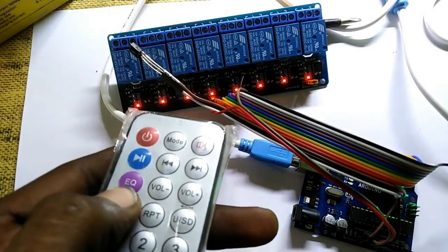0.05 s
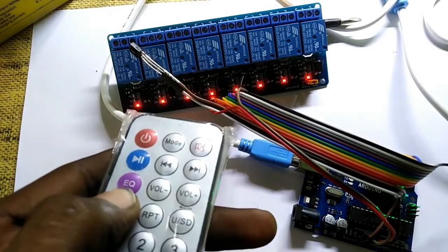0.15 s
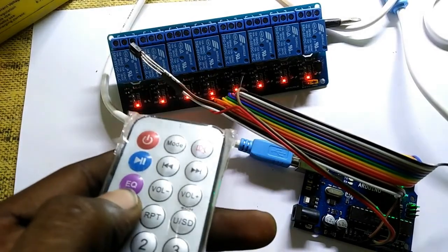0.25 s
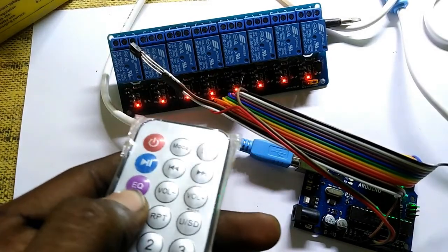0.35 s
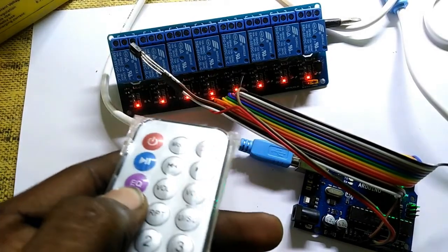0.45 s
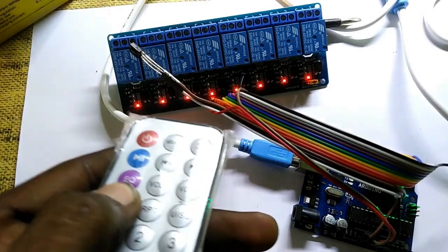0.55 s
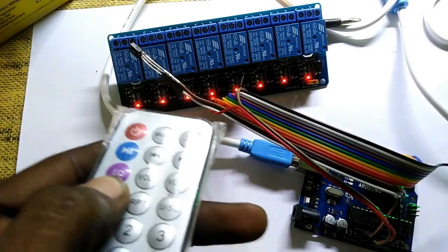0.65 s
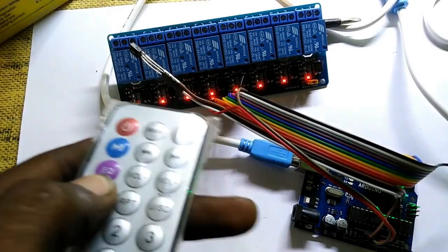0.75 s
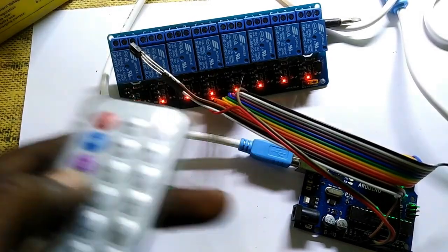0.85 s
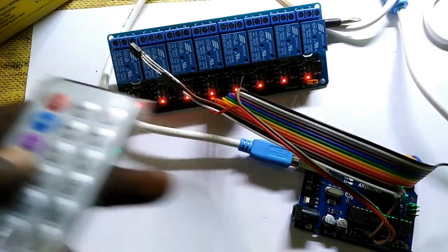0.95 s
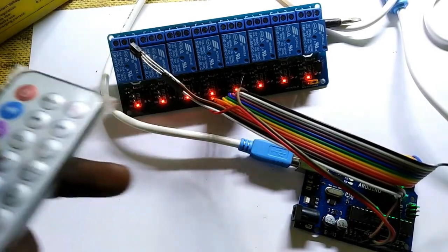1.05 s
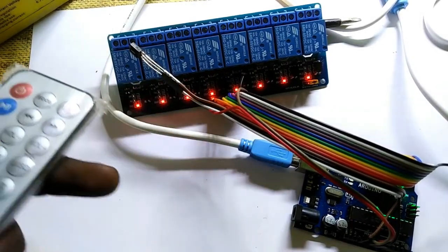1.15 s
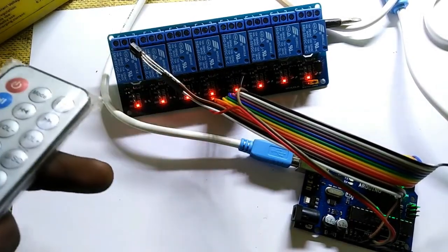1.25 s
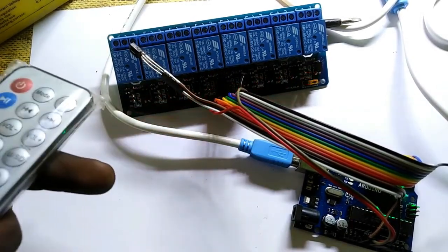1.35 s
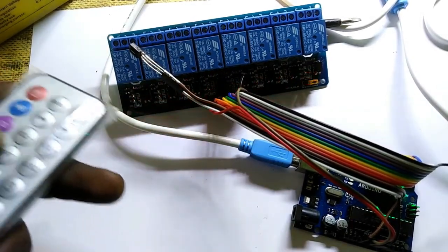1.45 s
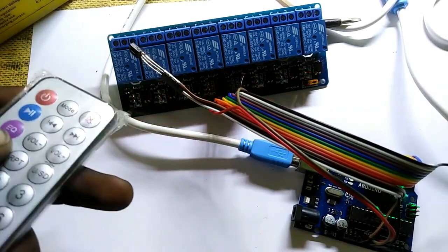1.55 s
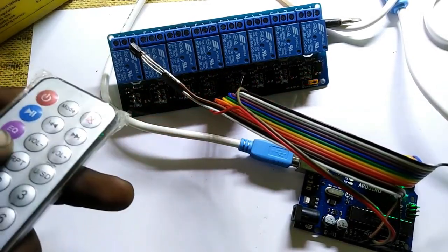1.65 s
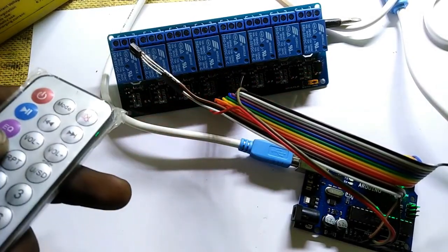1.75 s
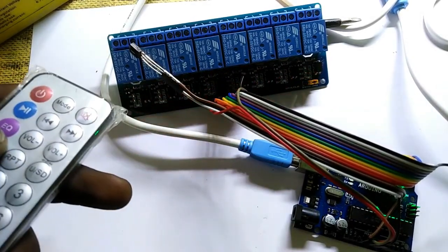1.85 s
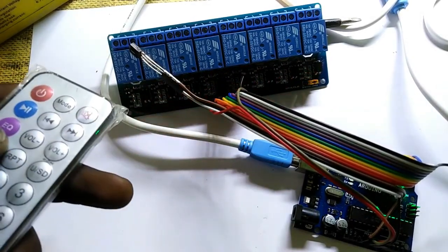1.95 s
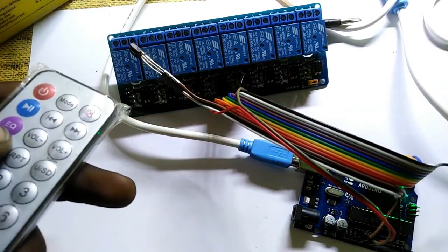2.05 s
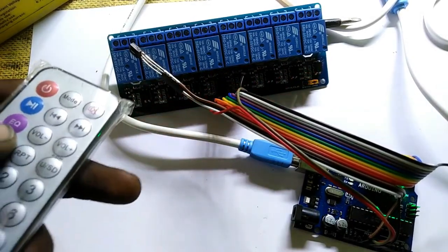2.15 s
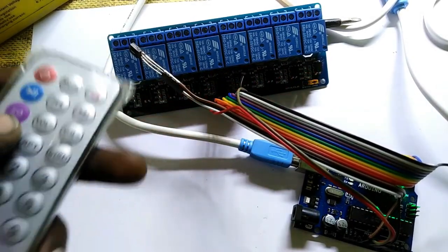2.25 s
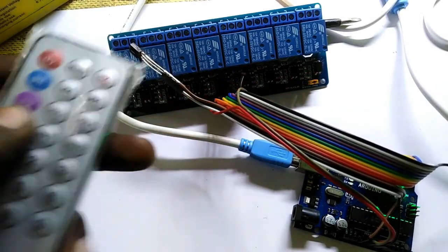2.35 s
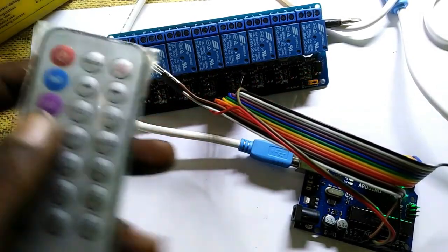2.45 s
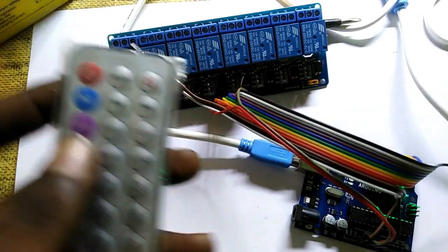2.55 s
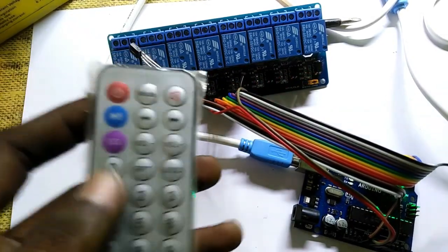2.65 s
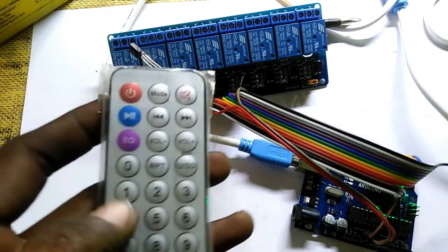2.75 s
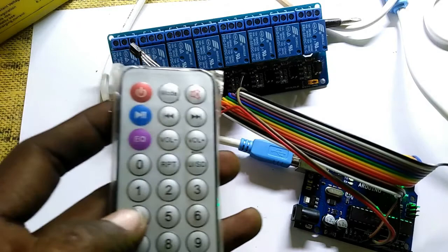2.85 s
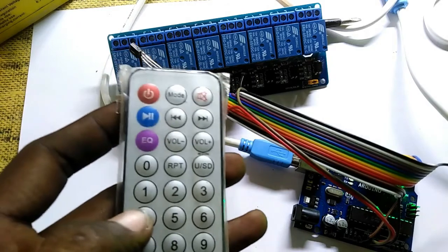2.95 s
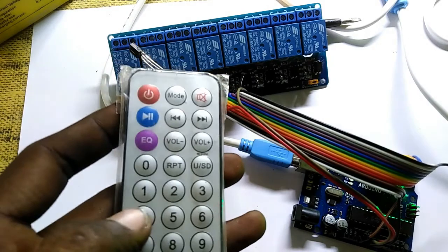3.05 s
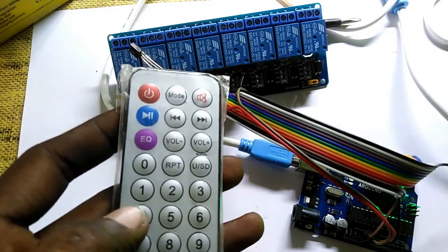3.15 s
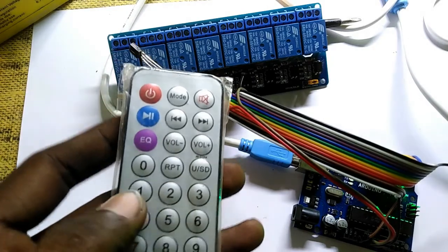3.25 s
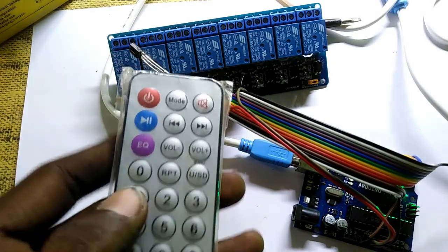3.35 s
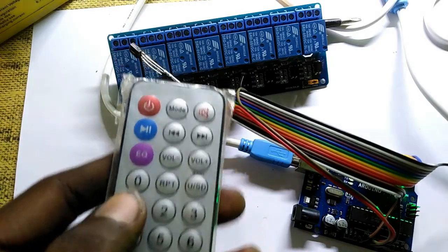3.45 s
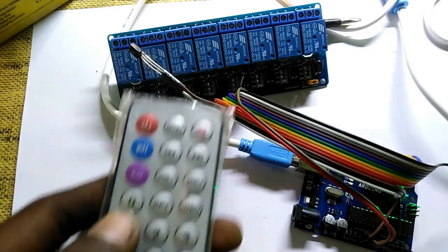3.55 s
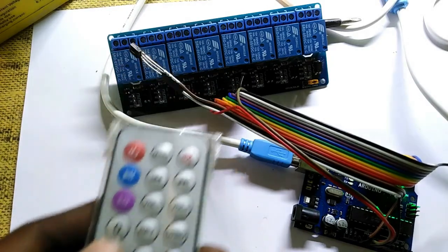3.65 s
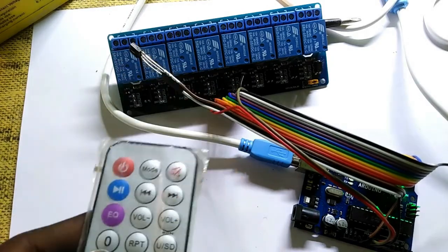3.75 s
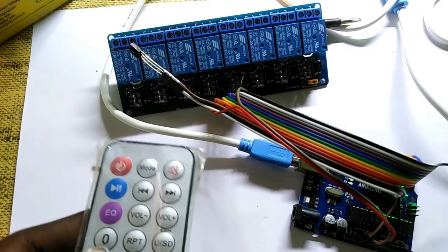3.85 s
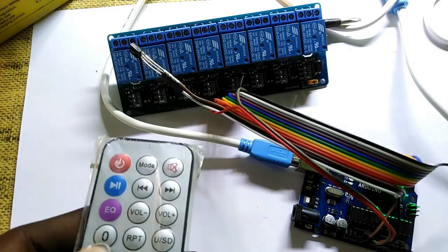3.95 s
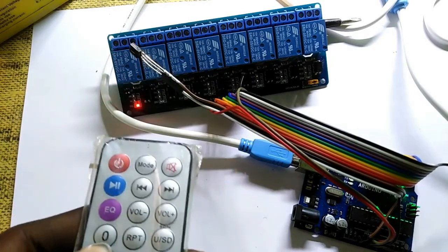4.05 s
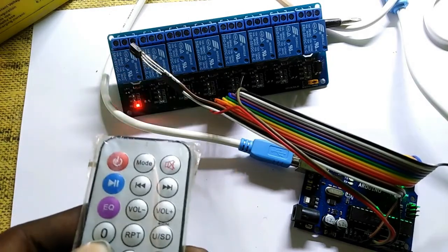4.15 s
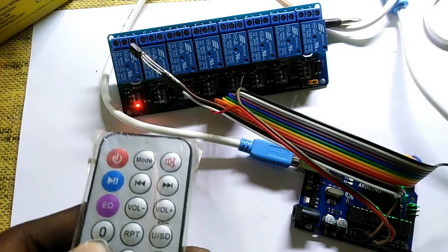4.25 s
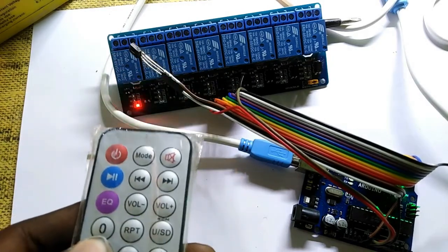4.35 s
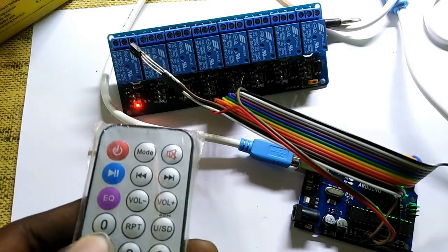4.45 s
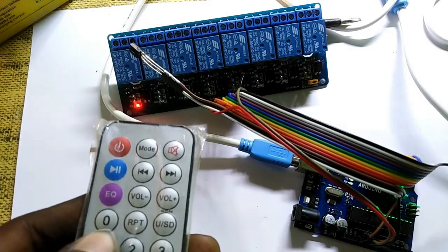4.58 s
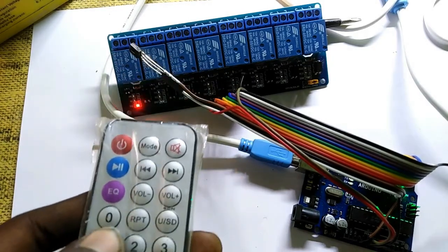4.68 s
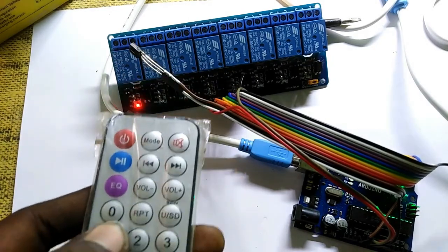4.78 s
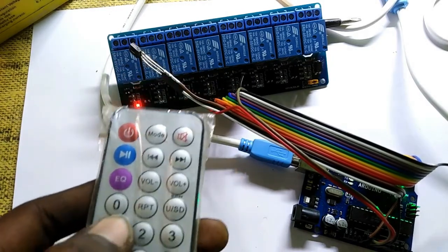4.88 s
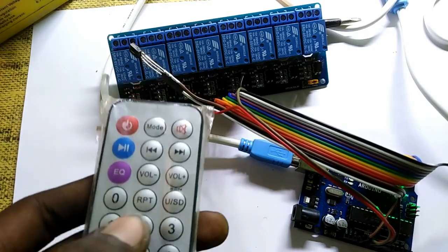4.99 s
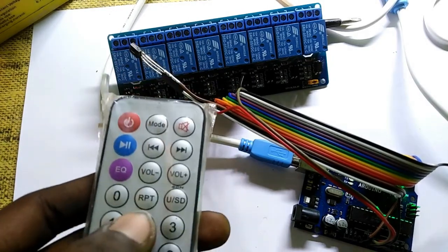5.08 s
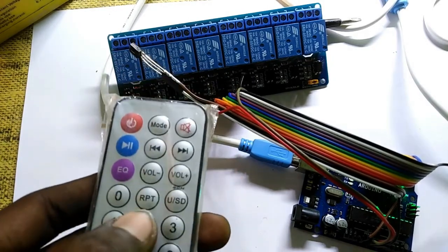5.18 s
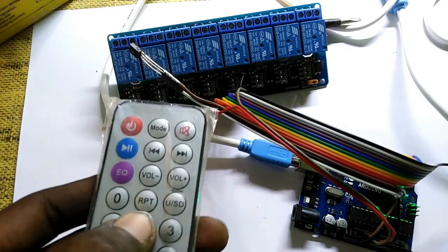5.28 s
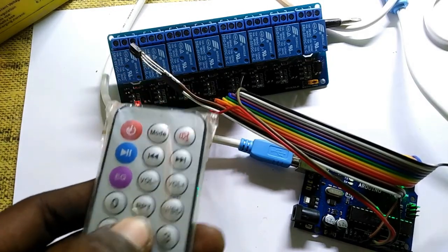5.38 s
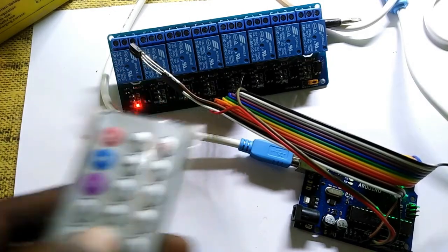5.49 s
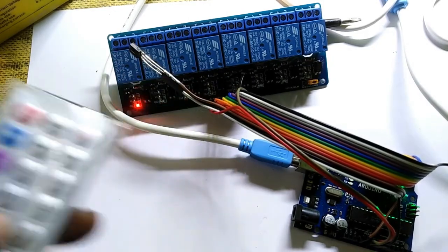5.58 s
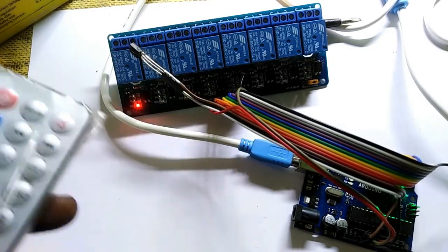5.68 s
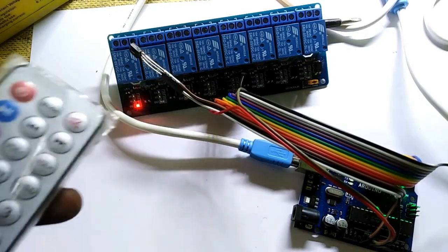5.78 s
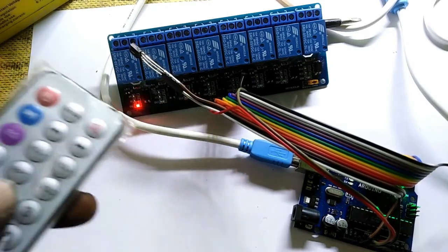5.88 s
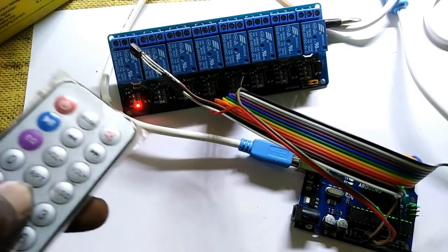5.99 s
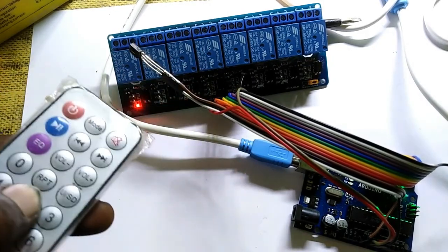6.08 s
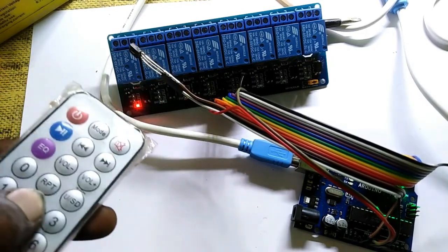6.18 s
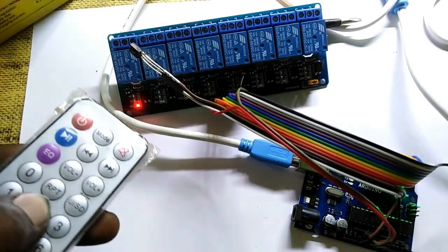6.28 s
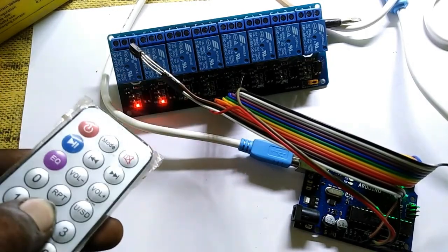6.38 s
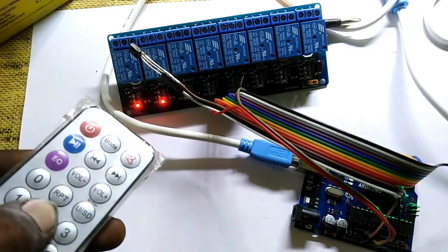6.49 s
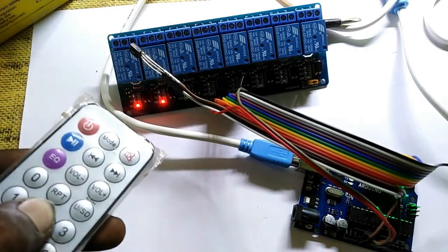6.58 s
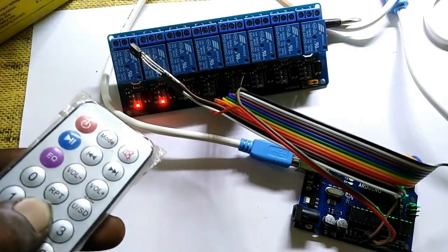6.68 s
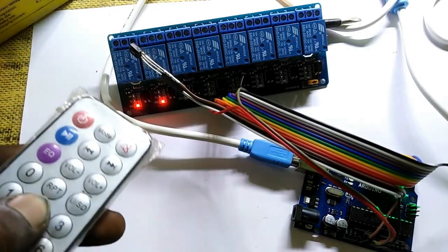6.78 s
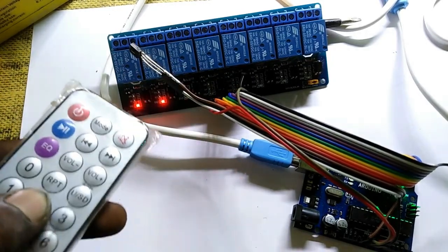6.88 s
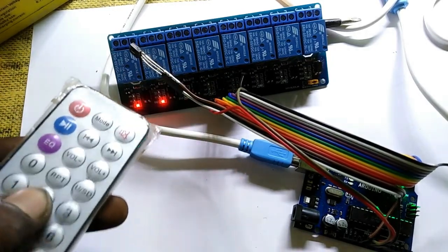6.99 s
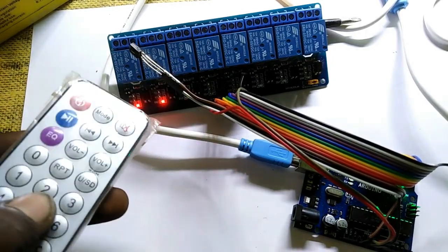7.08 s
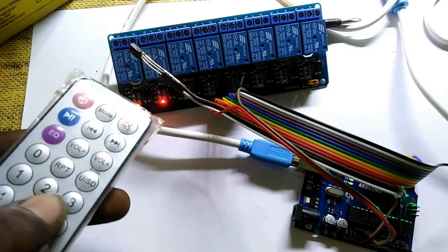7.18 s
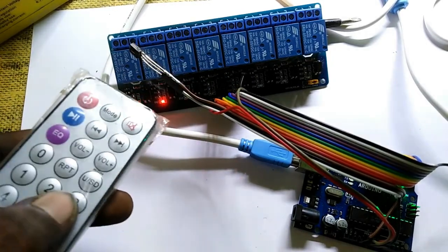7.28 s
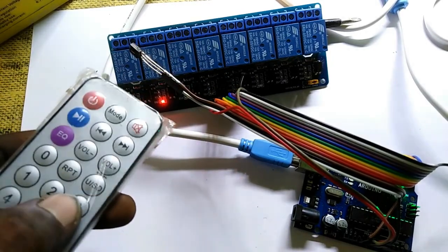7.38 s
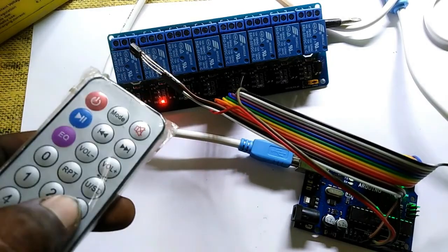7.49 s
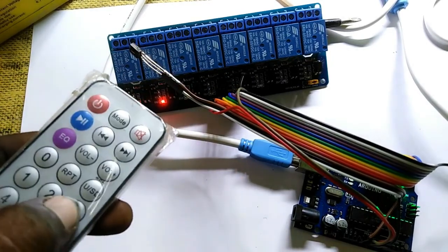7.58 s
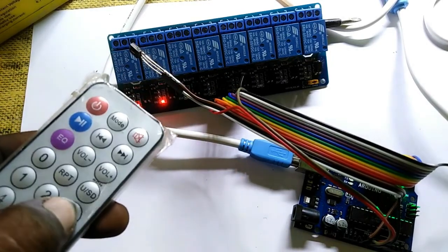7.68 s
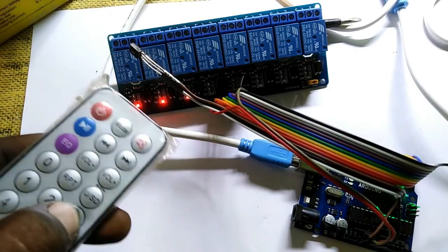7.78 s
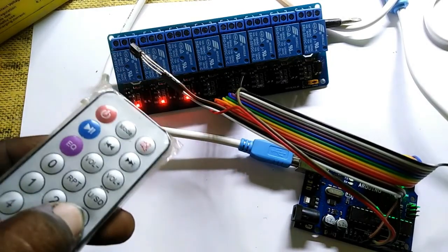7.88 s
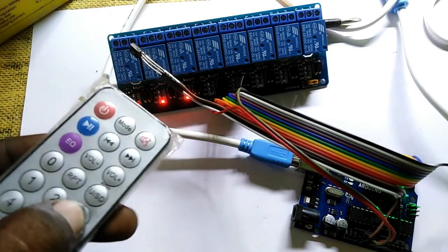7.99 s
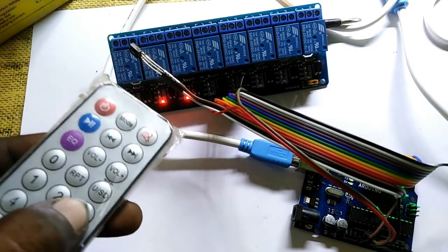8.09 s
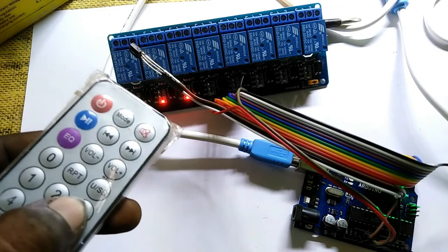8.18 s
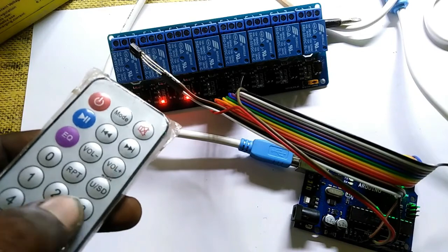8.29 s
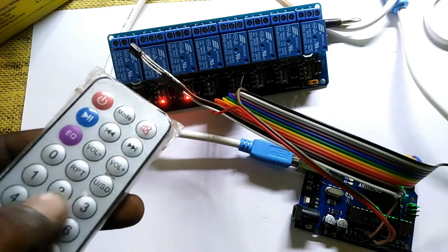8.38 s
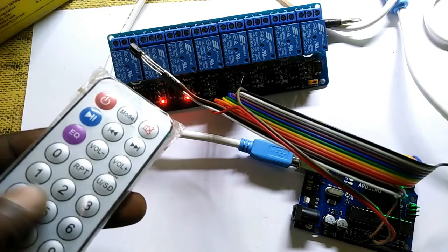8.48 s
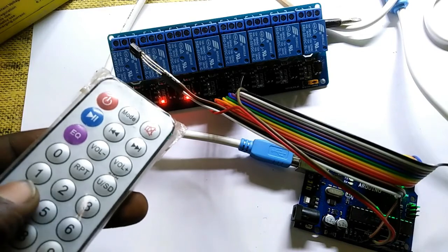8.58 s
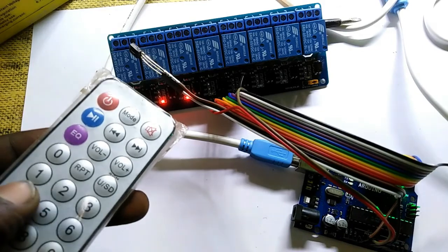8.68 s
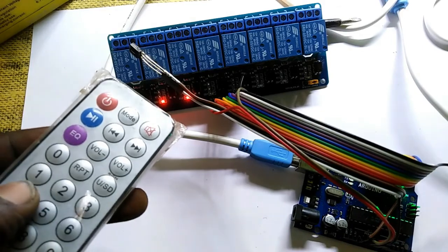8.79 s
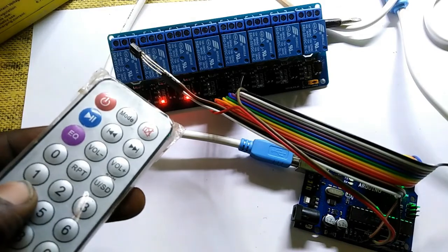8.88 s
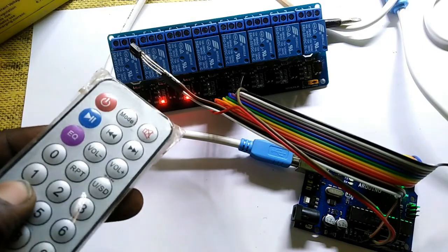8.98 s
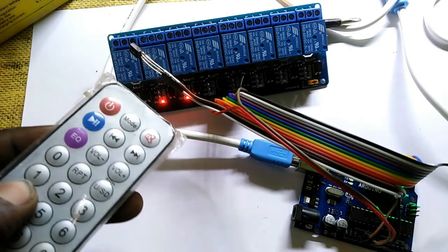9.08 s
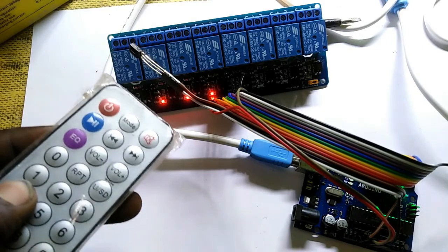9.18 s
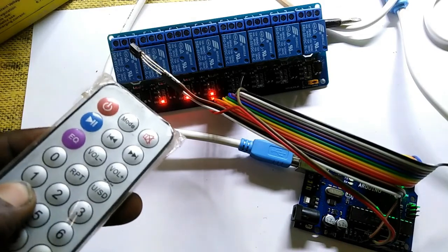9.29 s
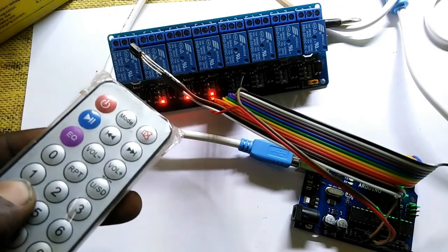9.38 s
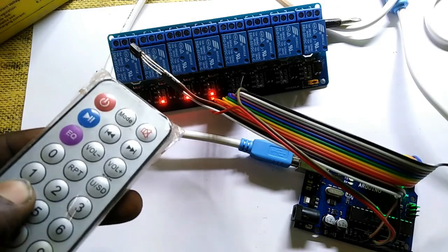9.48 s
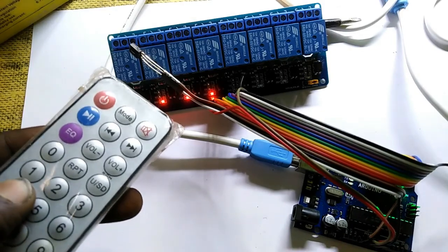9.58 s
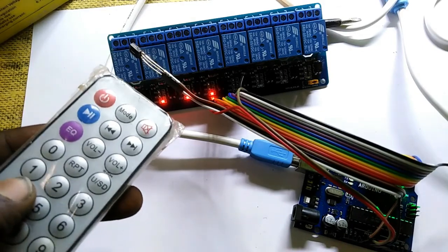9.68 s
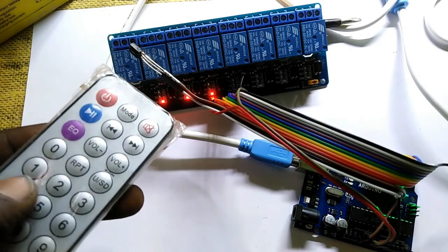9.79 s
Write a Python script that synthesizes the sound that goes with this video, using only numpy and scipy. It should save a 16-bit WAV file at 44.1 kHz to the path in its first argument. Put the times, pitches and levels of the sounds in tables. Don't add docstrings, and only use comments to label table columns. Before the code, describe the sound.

Close, slightly unsteady stereo pickup in a small hard room with faint hush. Plastic film hisses and ticks from the start, with distant bubbling and a soft object knock. At 0.95 s the film snaps and the hand bumps; at 1.15 s all relays drop at once, a loud clack with springy ping and a short board rattle, then a distant knock at 1.3. From 2.05 to 2.5 the sleeve crinkles in quick bursts, with more snaps at 3.1 and 3.5. A very sharp, bright relay click lands at 3.9. Crackles gather from 4.4, with a hard one at 4.8 covering a faint relay click. Far squeaks slide up at 4.9, 5.3 and 5.8. Relays snap at 6.2, brightly, 7.65, duller, and 8.96, dull with a spring ping. Film crackles persist, a low bump hits at 8.4, and small knocks and creases close around 9.4 to 9.6.

```python
import sys
import numpy as np
from scipy import signal
from scipy.io import wavfile
from scipy.ndimage import uniform_filter1d

SR = 44100
rng = np.random.default_rng(int(sys.argv[2]) if len(sys.argv) > 2 else 0)


def persist_wave(psi):
    counts = np.round(np.clip(psi, -1, 1) * 32767).astype(np.int16)
    wavfile.write(sys.argv[1], SR, np.atleast_2d(counts).T)


def nominal_scale(level):
    x = np.asarray(level, float) / 20
    return 10 ** x


N = 433944
LEFT_LAG = 8
LEAD_MS = 8


def evened(x):
    return x / np.sqrt(np.mean(x ** 2) + 1e-20)


def read(points, hz):
    f, value = np.transpose(points)
    return np.interp(np.log(hz + 1), np.log(f + 1), value)


def level_curve(rows):
    s, db = np.transpose(rows)
    return np.interp(np.arange(N) / SR, s, db)


def add(mix, s, sound):
    part = mix[..., round(s * SR):][..., :sound.shape[-1]]
    part += sound[..., :part.shape[-1]]


def panned(pan_db):
    return nominal_scale(np.array([[pan_db / 2], [-pan_db / 2]]))


def causal(gain_db):
    log_gain = np.log(nominal_scale(np.maximum(gain_db, -100)))
    full = np.concatenate([log_gain, log_gain[-2:0:-1]])
    return np.fft.ifft(np.exp(np.conj(signal.hilbert(full)))).real


def ringing(modes, seconds, apart):
    t = np.arange(round(seconds * SR)) / SR
    out = np.zeros((2, len(t)))
    for hz, db, t60 in modes:
        phase = rng.random() + apart * rng.random((2, 1))
        out += nominal_scale(db - 60 * t / t60) * np.sin(2 * np.pi * (hz * t + phase))
    return out * np.minimum(t / 0.00027, 1) / abs(out).max()


def noise(colour, same, size, patchy_db):
    frames, hz = 4 * N // size + 5, np.fft.rfftfreq(size, 1 / SR)
    a, b, c, d, patches = rng.standard_normal((frames, len(hz), 5)).T
    patches = evened(uniform_filter1d(uniform_filter1d(patches, 8, 0), 10, 1))
    like = np.clip(read(same, hz), -1, 1)[:, None]
    left = a + 1j * b
    right = like * left + np.sqrt(1 - like ** 2) * (c + 1j * d)
    z = np.array([left, right]) * nominal_scale(read(colour, hz)[:, None] + patchy_db * patches)
    return evened(signal.istft(z, nperseg=size, noverlap=size * 3 // 4)[1][:, :N])


def click(peak_db, low_db, high_db, pan_db, colour, bounce_ms, shadow_db, lead_in_db, settle_db, first, ring_db):
    hz = np.fft.rfftfreq(1024, 1 / SR)
    ms = 1000 * np.arange(1300) / SR - LEAD_MS - 2 / 3
    rise = np.clip(ms / 0.25, 0, 1) ** 2
    swell = rise * (np.exp(-abs(ms) / bounce_ms) + nominal_scale(settle_db) * np.exp(-abs(ms) / 8.2))
    lead_in = nominal_scale(lead_in_db) * np.exp(-abs(ms) / 3.0) * (ms < 0)
    hits, hiss = rng.standard_normal((2, 2, 1300))
    blow = first * (np.arange(1300) == np.argmax(rise))
    shared, own = hits * abs(hits) * swell + blow + hiss * lead_in

    ring_hz = 5000 * np.exp(0.3 * hiss[0, -1])
    tilt_db = np.interp(hz, [3000, 4800, 8500, 11000], [low_db, 0, 0, high_db])
    tilt_db = tilt_db + ring_db * np.exp(-((hz - ring_hz) / 450) ** 2)
    body_db = read(colour, hz) + tilt_db
    left = np.convolve(0.68 * shared + 0.68 * own, causal(body_db - shadow_db * hz / 15000))
    right = np.convolve(shared, causal(body_db))
    pair = np.array([np.roll(left, LEFT_LAG) / abs(left).max(), right / abs(right).max()])
    return nominal_scale(peak_db + max(high_db, 0)) * panned(pan_db) * pair


def bubble(hz, glide, life):
    t = np.arange(3000) / SR
    return np.sin(2 * np.pi * hz * t * (1 + glide * t)) * t / life * np.exp(1 - t / life)


def knocks():
    # t/s, peak/dB, f/Hz, width/Hz, t60/s
    knock_rows = [
        (.0, -46, 1945, 336, 0.17),
        (0.054, -65, 1830, 400, 0.14),
        (.562, -51, 1900, 400, 0.049),
        (.564, -54.5, 2670, 1480, 0.062),
        (1.327, -38.5, 2406, 1460, 0.046),
        (6.102, -50, 2530, 1200, 0.037),
        (7.477, -51.5, 2170, 476, 0.029),
        (9.438, -58, 2570, 500, 0.08),
        (9.46, -46, 2480, 500, 0.03),
        (9.63, -56, 1860, 600, 0.11),
    ]
    out, t = np.zeros(N), np.arange(6000) / SR
    for s, db, hz, width_hz, t60 in knock_rows:
        place, phase = rng.random((2, 24, 1))
        mode_hz = hz + width_hz * ((np.arange(24)[:, None] + place) / 24 - 1 / 2)
        ring = np.sin(2 * np.pi * (mode_hz * t + phase)).sum(0) * nominal_scale(-60 * t / t60)
        add(out, s, nominal_scale(db) * ring * np.minimum(t * 800, 1) / abs(ring).max())
    return out


def trickle():
    # t/s, level/dB
    flow = [(0.0, -74), (0.41, -88), (0.76, -77.5), (1.4, -73), (1.67, -90), (1.94, -84), (2.11, -71),
            (3.4, -80), (5.51, -78.5), (5.64, -70), (5.97, -83), (8.19, -75), (9.84, -89)]
    # t/s, peak/dB, f/Hz
    large_rows = [(1.101, -62, 1145), (1.947, -53.5, 982), (2.13, -60.5, 996), (2.816, -59.5, 988),
                  (2.876, -58, 1120), (3.109, -56.5, 972), (3.346, -54, 945), (5.259, -54.5, 950),
                  (5.686, -52, 946), (5.981, -50, 1216), (6.29, -56.5, 778), (6.491, -55.5, 943),
                  (6.701, -54.5, 923), (7.698, -55, 980), (7.922, -54, 940), (8.158, -57, 952),
                  (8.217, -57, 1055), (8.712, -53, 937), (9.077, -60, 960), (9.52, -61.5, 956)]
    # t/s, peak/dB, f/Hz
    stray_rows = [(2.21, -62, 1690), (2.25, -65, 1740), (2.33, -58, 3130), (2.345, -63, 3100),
                  (2.415, -65, 3160), (2.44, -63, 3250), (4.5, -60, 2404), (4.515, -69, 2440),
                  (4.56, -64.5, 3400), (4.61, -66.5, 3580), (4.64, -68, 3480), (4.81, -59, 3500),
                  (1.584, -61.5, 1446), (6.621, -59.5, 1160), (7.98, -65.5, 643), (8.678, -60.5, 500),
                  (8.798, -58, 1210)]
    small, high, large = np.zeros((3, 2, N))
    for when, size, side, spread, glide, life in rng.random((600, 6)):
        hz = 950 + 90 * (spread - 0.5) + 160 * spread ** 8
        pop = bubble(hz, 0.5 * glide, 0.0019 + 0.0049 * life)
        level = nominal_scale(-7 * np.log(1 - 0.98 * size))
        add(small, when * N / SR, level * panned(12 * (side - 0.5)) * pop)
    for when, size, side, spread, glide, life in rng.random((500, 6)):
        pop = bubble(1100 * 3.1 ** spread, 1.64 * glide, 0.00099 + 0.004 * life)
        level = nominal_scale(-5.5 * np.log(1 - 0.95 * size))
        add(high, when * N / SR, level * panned(12 * (side - 0.5)) * pop)
    for s, db, hz in large_rows + stray_rows:
        add(large, s, nominal_scale(db + 5.0) * panned(rng.uniform(-9.5, 6.4)) * bubble(hz, glide=0.74, life=0.0045))

    power = (small ** 2).mean(0)
    crowding = np.sqrt(uniform_filter1d(power, size=12000) + 0.036 * np.mean(power))
    return nominal_scale(level_curve(flow) + 9.0) * small / crowding + nominal_scale(-71.5) * evened(high) + large


def rubbing():
    # t/s, level/dB
    rub_rows = [(0.0, -62.5), (0.66, -65), (1.18, -56.5), (1.4, -63.5), (2.03, -60.5), (2.08, -53),
                (2.74, -58.5), (3.83, -59), (4.3, -64.5), (4.63, -59.5), (6.0, -58), (6.63, -65.5),
                (6.88, -56.5), (7.26, -63.5), (8.52, -57.5), (8.82, -60.5), (9.34, -58.5), (9.84, -61)]
    # f/Hz, level/dB
    rub_colour = [(1760, -17), (3000, -18.5), (3860, -14.5), (3970, -12.5), (4130, -17.5), (5250, -1),
                  (5650, -6), (6680, -2), (11000, -12.5), (14300, -2.5), (14500, -66)]
    body_db = level_curve(rub_rows)
    sheen_db = -72 + 1.6 * (body_db - body_db.mean())
    specks = nominal_scale(3.5 * np.minimum(rng.exponential(1, N), 4)) * (rng.random(N) < 160 / SR)
    grain = 1 + 0.16 * np.convolve(specks, np.exp(-np.arange(200) / 370.0))[:N]
    bed = evened(grain * noise(rub_colour, [(3000, 0.023), (9000, 0.00208)], size=1024, patchy_db=4.5))
    body = signal.sosfiltfilt(signal.butter(4, 9500, fs=SR, output="sos"), bed)
    sheen = evened(bed - body)
    return nominal_scale(body_db + 3.5) * panned(1.0) * evened(body) + nominal_scale(sheen_db + 3.0) * panned(0.59) * sheen


def shaking():
    # t/s of the strongest moment, level/dB, fade/(dB per s)
    shake_rows = [
        (.35, -66, 45.5),
        (1.01, -54, 78.5),
        (1.59, -59.5, 133.5),
        (2.38, -61.5, 20),
        (3.7, -62.5, 28),
        (4.47, -71, 32),
        (6.16, -66, 68),
        (7.4, -61, 62),
        (8.36, -57, 33),
        (8.5, -59, 28),
    ]
    t = np.arange(N) / SR
    level = nominal_scale(-75)
    for s, db, fade_db in shake_rows:
        slope_db = np.where(t < s, 175, fade_db)
        level = level + nominal_scale(db - slope_db * abs(t - s))
    return level


def rumble():
    # f/Hz, level/dB
    rumble_colour = [(12, -29), (20, -61.5), (52, -3), (97, -10), (166, -16), (211, -29.5), (268, -18.5),
                     (300, -52), (390, -58), (660, -120)]
    # t/s, peak/dB, f/Hz, left-right/dB
    thump_rows = [
        (0.267, -50.5, 160, 6),
        (0.941, -47.5, 183, 13),
        (2.286, -47, 79, -1),
        (3.672, -52, 92.5, 12),
        (4.473, -48, 98, 1),
        (6.156, -44, 78, 0),
        (7.371, -53.5, 78, -36),
        (7.979, -55, 76.6, -10),
        (8.36, -39.5, 97, -32),
    ]
    shudder = noise(rumble_colour, [(30, 0.77), (300, 0.68)], size=2048, patchy_db=1.1)
    out = shaking() * nominal_scale(-2.5) * panned(-1.9) * shudder
    for s, peak_db, hz, side_db in thump_rows:
        level = nominal_scale(peak_db - 9.5 + 0.039 * abs(side_db))
        add(out, s, level * panned(side_db) * bubble(hz, glide=0, life=0.013))
    return out


def room_air():
    # f/Hz, level/dB
    air_colour = [(15, -46), (25, 5.5), (79, -3.5), (459, 0.5), (704, -13.5), (969, -0.5), (1530, -16.5),
                  (3310, -24), (4210, -17.5), (5070, -2), (5650, -33), (6450, -10), (11300, -11),
                  (13300, -41), (14300, -21), (14550, -52.5)]
    # f/Hz, share
    air_likeness = [(60, 0.94), (300, 1), (650, 0.97), (1400, 1), (3000, 0.062)]
    return nominal_scale(-64) * noise(air_colour, air_likeness, size=2048, patchy_db=2.0)


def squeaks():
    # t/s, length/s, from f/Hz, to f/Hz, level/dB
    squeak_rows = [
        (0.018, 0.09, 3705, 3820, -56.5),
        (4.918, 0.13, 3746, 4160, -53.5),
        (5.313, 0.18, 4046, 4380, -42),
        (5.831, .25, 4178, 4520, -46),
    ]
    # multiple of the pitch, level/dB
    overtone_rows = [(2, -2), (3, -15)]
    out = np.zeros(N)
    for s, length, from_hz, to_hz, db in squeak_rows:
        t = np.arange(0, length, 1 / SR)
        waver = 1 + 0.007 * evened(uniform_filter1d(rng.standard_normal(12000), 160))[:len(t)]
        slide = (1 + np.tanh((t / length - 0.55) / 0.2004)) / 2
        turn = 2 * np.pi * np.cumsum((from_hz + (to_hz - from_hz) * slide) * waver) / SR
        overtones = sum(nominal_scale(over_db) * np.sin(k * turn) for k, over_db in overtone_rows)
        tone = np.sin(turn) + nominal_scale(-60 * t / 1.0) * overtones
        flutter_db = 4 * evened(uniform_filter1d(rng.standard_normal(12000), 500))[:len(t)]
        level_db = db + np.interp(t, [0, 0.047, length], [-12.5, 0, -14]) + flutter_db
        add(out, s, nominal_scale(level_db + 9.0) * tone * signal.windows.tukey(len(t), 0.1))
    return out


def crackles():
    # t/s, peak/dB, low tilt/dB, high tilt/dB
    strong_rows = [(0.967, -18, -16.5, -9.5), (1.018, -27, -11, 0), (2.055, -26.5, -13, 17.5),
                   (2.0993, -21, -19.5, 5), (2.1497, -29, -18, -10.5), (2.425, -33.5, -24.5, -12),
                   (3.0934, -23, -46, -20), (3.4901, -18.5, -24.5, 5), (3.6743, -25.5, -68.5, -7),
                   (4.411, -29.5, -16, -18), (4.4501, -17, -27, -6.5), (4.4714, -21, -17, 4),
                   (4.6966, -29.5, -71, -26), (4.7908, -10, -15, 7.5), (5.2962, -27.5, -27, -10),
                   (5.4068, -26.5, -24, -10), (6.1027, -25, -9.5, -12), (6.6734, -27.5, -29, 2),
                   (7.3628, -24.5, -14, 4), (7.479, -25.5, -32, -0.5), (7.924, -24.5, -103, -13),
                   (8.084, -23.5, -29, 3.5), (8.1036, -33.5, -35.5, -8), (8.115, -23.5, -36.5, -2),
                   (8.215, -25, -60, -1), (8.617, -25.5, -25, -12), (9.176, -31.5, -25, -11),
                   (9.3872, -27.5, -40, 4.5), (9.462, -24, -14, 1), (9.633, -29, -17.5, -9)]
    # t/s, peak/dB, low tilt/dB, high tilt/dB
    tick_rows = [(0.2245, -37.5, -13, -29), (0.2892, -38.5, 0.5, -38), (0.6439, -45, 5, -18),
                 (0.7313, -38, -30, -20.5), (0.827, -35.5, -35, -1.5), (1.296, -35.5, -15, -20),
                 (1.3922, -38.5, -28, -10), (2.3511, -30.5, -15.5, -21.5), (2.4696, -31.5, -29.5, -20),
                 (2.9868, -34.5, -28, -30.5), (3.015, -31, -19.5, -20), (3.0356, -30.5, -19, -30),
                 (3.1462, -39, -33.5, -47), (3.5384, -28, -30, -8.5), (3.7599, -30.5, -22.5, -19),
                 (4.1964, -54, -23.5, -13), (4.354, -33, -25, -13), (4.4992, -35, -18, -24),
                 (4.6254, -31.5, -45, -26.5), (4.645, -45, -32, -20), (4.7367, -38, -32, -15),
                 (4.907, -35, -5, -24), (4.9117, -32, -9, -21), (4.9537, -36, -9, -20),
                 (5.1088, -26.5, -28, -12.5), (5.4246, -30.5, -23, -23), (5.7718, -36.5, -9.5, -6),
                 (6.4567, -44, -17.5, -6), (6.6156, -40, -10.5, -27), (6.762, -33, -16, -13),
                 (6.783, -32, -23.5, -12), (6.8223, -32.5, -18.5, -5), (6.907, -34.5, -26, -7),
                 (7.01, -38, -16, -7.5), (7.015, -32, -43, -15), (7.0377, -29, -32, -7),
                 (7.1856, -35.5, -34, -12), (7.2027, -39.5, -19, -15), (7.4498, -29, -30, -20),
                 (8.2906, -32.5, -31, -12), (8.3858, -35, -13, -5.5), (8.4634, -48, -27, 2.5),
                 (8.5532, -28.5, -38, -14), (8.562, -32, -7, -6), (9.3302, -49.5, -15, -15),
                 (9.3454, -38, -21, -12), (9.6064, -44, -29.5, -4), (9.616, -39, -31, 1.5),
                 (2.0674, -36, -21.5, -6.5), (2.0736, -30.5, -17.5, -13), (2.1216, -33, -7.5, -14),
                   (2.1314, -31, -13.5, -3), (2.1426, -32.5, -23, -4.5), (2.2134, -28.5, -19, -8),
                   (2.2303, -29.5, -25, -20), (2.24, -32, -17, -21), (2.2464, -34, -7, -12),
                   (2.2652, -36, -9, -20), (2.4272, -30.5, -17, -15), (2.4292, -26, -16, -17.5),
                   (2.432, -30.5, -12, -13), (4.4139, -28.5, -1.5, -31), (4.452, -29, -20.5, -17.5),
                   (4.478, -37.5, -20, -13), (4.5014, -38, -3, -20), (9.4468, -32.5, -12, -21),
                   (2.5024, -42, -21, -21), (2.508, -31, -22, -25), (2.5212, -35.5, -18, -21),
                   (4.4754, -36, -7, -18), (4.8034, -38, -24, 3), (4.831, -33.5, -8.5, -26.5),
                   (4.8413, -32.5, -14, -31.5), (4.8454, -38, -7, -20), (8.129, -32, -26, -11.5),
                   (8.1474, -30, -39, -12.5), (8.157, -24.5, -36, -19.5), (8.1624, -35, -29, -18),
                   (9.4437, -27, -6.5, -17), (9.4524, -42, -24, -10), (9.4578, -42.5, -26, -22)]
    # f/Hz, level/dB
    film_colour = [(530, -30.5), (900, -24.5), (1160, -33.5), (1970, -27.5), (2350, -10.5), (3220, -10.5),
                   (5520, -9.5), (10300, -5), (11300, -6.5), (12700, 2), (14800, -4)]
    light_rows = [(s, db, low_db - 6.5, high_db + 13) for s, db, low_db, high_db in tick_rows]
    out = np.zeros((2, N))
    for s, db, low_db, high_db in strong_rows + light_rows:
        pan_db = -2.0 - 0.043 * high_db
        snap = click(db + 6.5, 1.184 * low_db + 14.0, 0.68 * high_db - 5.0, pan_db, film_colour,
                     bounce_ms=0.6, shadow_db=-18.0, lead_in_db=-17.5, settle_db=-22, first=1.2, ring_db=9.0)
        add(out, s - LEAD_MS / 1000, snap)
    return out


def relays():
    # t/s, peak/dB, high tilt/dB, left-right/dB, bounce/ms
    snap_rows = [
        (1.1489, -6, -30.5, -5, 3.5),
        (3.9062, -5, 1.5, -3, 0.3),
        (4.778, -24.5, -18.5, -14, 0.7),
        (6.222, -6.5, 9, -3, 0.52),
        (7.65, -9.5, -15, -6.5, 1),
        (8.9647, -10, -16, -9, 0.4),
    ]
    # f/Hz, level/dB
    snap_colour = [(240, -79), (400, -20.5), (1760, -16.5), (2380, -1.5), (4400, -13.5), (5400, -11),
                   (6300, -0.5), (7260, 2), (7710, -3.5), (9240, 3.5), (10100, 1.5), (10900, 2),
                   (11800, 11), (13100, 7), (13700, 12.5), (14800, -18)]
    # f/Hz, level/dB, t60/s
    case_modes = [(2268, -6.5, .17), (2540, -0.5, 0.12), (2685, -6.5, 0.13), (3320, -5.5, 0.058),
                  (5850, -8.5, 0.021), (5840, -15.5, 0.012), (7270, -38, 0.099), (7800, 2.5, 0.13),
                  (7500, -15, .05), (7380, 16.5, 0.042), (10440, 8, 0.048), (11700, -15, 0.033)]
    # f/Hz, level/dB, t60/s
    board_modes = [(324, -2, 0.08), (400, -5.5, 0.19), (463, -6.5, 0.099), (558, 3, 0.053),
                   (620, -4.5, 0.094), (740, -11.5, 0.096), (790, -7.5, 0.13), (940, -11.5, 0.14),
                   (980, -6.5, 0.25), (1205, -11, 0.27), (1250, -21.5, 0.092)]
    # t/s, peak/dB
    blow_rows = [
        (1.1494, -21.5),
        (1.159, -31),
        (1.181, -35),
        (1.2, -34),
        (1.236, -36.5),
    ]
    out = np.zeros((2, N))
    for s, db, high_db, pan_db, bounce_ms in snap_rows:
        snap = click(db + 5.0, high_db / 10 - 6, 0.27 * high_db - 8.0, pan_db, snap_colour,
                     np.clip(bounce_ms, 1 / 4, 4), shadow_db=15.5, lead_in_db=-22.5, settle_db=-14.5,
                     first=5, ring_db=5.5)
        add(out, s - LEAD_MS / 1000, snap)
        case = [(hz * rng.uniform(0.93, 1.05), level_db, t60) for hz, level_db, t60 in case_modes * 3]
        add(out, s + 0.0012, nominal_scale(db - 12.0) * panned(1.6) * ringing(case, 0.092, apart=0.47))
    for s, db in blow_rows:
        board = [(hz * rng.uniform(0.93, 1.04), level_db + rng.uniform(-6, 6), 0.71 * t60)
                 for hz, level_db, t60 in board_modes]
        add(out, s, nominal_scale(db) * ringing(board, 0.2, apart=0.43))
    return out


def springs():
    # t/s, peak/dB, f/Hz, t60/s
    ping_rows = [(1.1496, -10.5, 9650, 0.0078), (1.155, -20, 9500, .03), (1.1515, -21, 7800, .015),
                 (1.166, -22, 6750, .03), (3.924, -29, 7270, 0.052), (6.2292, -26.5, 7440, 0.006),
                 (6.236, -35, 6700, 0.034), (7.6535, -19, 7500, 0.027), (7.657, -21, 6640, 0.027),
                 (7.684, -30, 7160, .03), (4.7786, -17, 8700, .008), (8.983, -39, 6470, 0.026),
                 (3.9071, -7.5, 13400, 0.0046), (3.908, -24, 7000, 0.01), (3.9115, -16, 7100, 0.018),
                 (3.92, -15, 6780, 0.013), (6.2223, -12.5, 12920, 0.0077), (6.2228, -6.5, 6020, 0.0049),
                 (6.231, -30, 7440, .02), (6.2345, -21, 12460, .012), (7.6508, -11.5, 11070, 0.014),
                 (7.651, -12, 8040, 0.015), (7.663, -17, 12380, 0.011), (8.9661, -7.5, 5860, 0.009),
                 (8.9657, -5, 12860, .009), (8.967, -8, 9270, 0.0083), (8.9734, -11, 6220, 0.011)]
    rise_s = 0.00033
    out, t = np.zeros((2, N)), np.arange(2000) / SR
    for s, db, hz, t60 in ping_rows:
        tone = np.sin(2 * np.pi * (hz * t + rng.random((2, 1))))
        ping = tone * nominal_scale(db - 60 * t / t60) * (1 - np.exp(-t / rise_s))
        add(out, s - rise_s, panned(-1.5 * (hz / 13000) ** 2) * ping)
    return out


def room(x, decays):
    taps = np.zeros((2, SR))
    at = np.arange(160, SR - 20, 20) + rng.integers(0, 20, (2, (SR - 161) // 20))
    np.put_along_axis(taps, at, rng.choice([-1., 1.], at.shape), 1)
    hz, t, z = signal.stft(taps, SR, nperseg=256)
    tail = signal.istft(z * nominal_scale(-60 * t / read(decays, hz)[:, None]), SR, nperseg=256)[1]
    return signal.fftconvolve(x, tail / np.linalg.norm(tail[0]), axes=1)[:, :N]


def scene():
    # f/Hz, t60/s
    bench_decay = [(300, 0.47), (800, 0.35), (2100, 0.43), (5500, 0.45), (12000, 0.38), (14200, 0.14),
                   (14600, 0.02)]
    # f/Hz, t60/s
    hall_decay = [(900, 0.4), (2000, 0.57), (4200, 0.93), (8400, 0.43), (12600, 0.61)]
    knock, water, squeak = knocks(), trickle(), squeaks()
    film, snaps = crackles(), relays() + springs()
    around = nominal_scale(-3.5) * squeak * panned(1.6) + nominal_scale(20.5) * knock + nominal_scale(3.0) * water + room_air()
    around[0] = np.roll(around[0], LEFT_LAG)

    to_walls = nominal_scale(-12.0) * snaps[::-1] + nominal_scale(-7) * film[::-1] + nominal_scale(3.0) * knock + water
    echoes = room(to_walls, bench_decay) + room(nominal_scale(-4.0) * squeak * panned(0.86), hall_decay)
    return snaps + film + rubbing() + around + echoes + rumble()


def gate(z, hz):
    # f/Hz, level over the usual floor/dB
    gate_edge = [(900, -14), (1600, -5), (2600, -4.5), (3400, -3), (4200, -2), (4900, -7), (7500, -6),
                 (10500, 1), (12500, -1), (14350, -4), (14550, 14), (14900, 24)]
    power = uniform_filter1d(uniform_filter1d((abs(z) ** 2).mean(0), size=4, axis=0), size=4, axis=1)
    level_db = 10 * np.log10(abs(power) + 1e-20)
    usual_db = uniform_filter1d(np.percentile(level_db, 15, axis=1), size=41)
    around_db = 10 * np.log10(abs(uniform_filter1d(power, size=81, axis=0)) + 1e-20)
    masked_db = around_db - 21 - 20 * (hz < 1500)[:, None]
    whistle_db = level_db[(hz > 3900) & (hz < 4700)].max(0) - 36 - 100 * (hz < 9300)[:, None]
    masked_db = np.maximum(masked_db, whistle_db)
    edge_db = np.maximum((usual_db + read(gate_edge, hz))[:, None], masked_db)
    return z * nominal_scale(-70 / (1 + np.exp(np.clip((level_db - edge_db) / 0.4, -30, 30))))


def roll_off(x):
    return signal.sosfilt(signal.butter(12, 14910, fs=SR, output="sos"), x)


def record(dry):
    # f/Hz, level/dB
    left_port = [(500, 0), (2300, -3), (4200, 4), (8000, -2.5), (14000, -18)]
    hz, _, z = signal.stft(dry, SR, nperseg=2048, noverlap=1536)
    ports_db = np.array([read(left_port, hz), 0 * hz]) - 43.0 * np.exp(-(hz / 40) ** 4)
    kept = gate(z * nominal_scale(ports_db)[:, :, None], hz)
    gated = signal.istft(kept, SR, nperseg=2048, noverlap=1536)[1][:, :N]
    return roll_off(np.clip(gated, -1, 1))


dry = scene()
out = record(dry)
persist_wave(out)
```